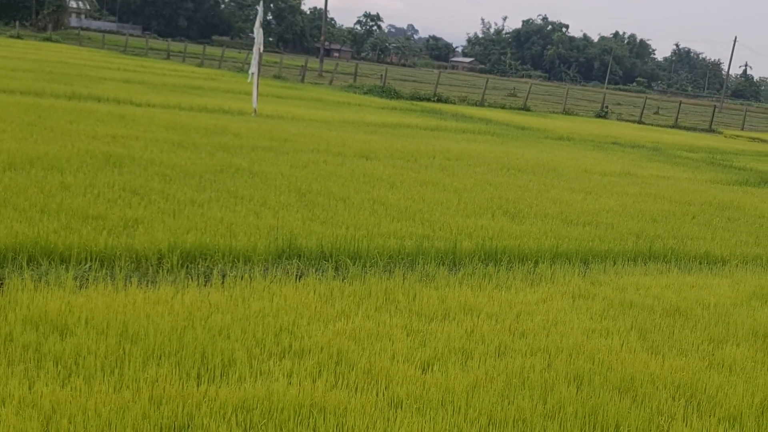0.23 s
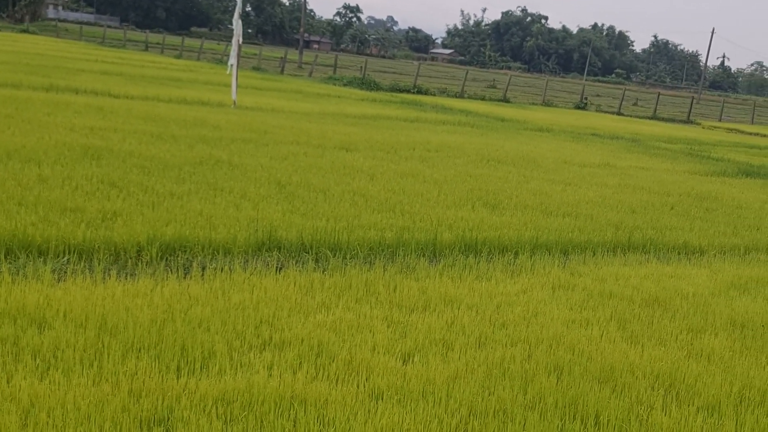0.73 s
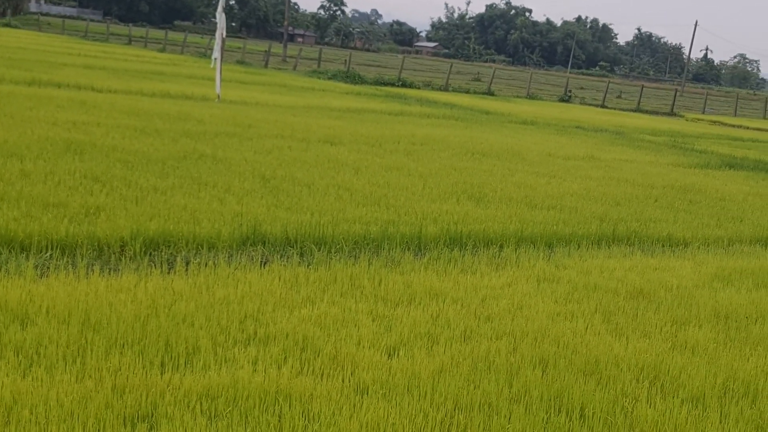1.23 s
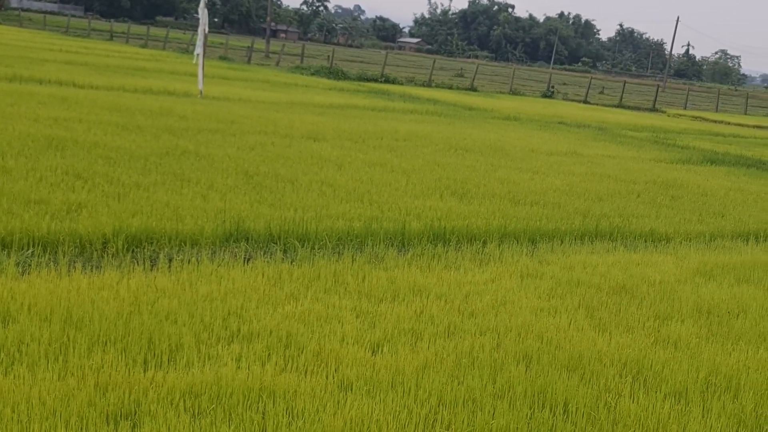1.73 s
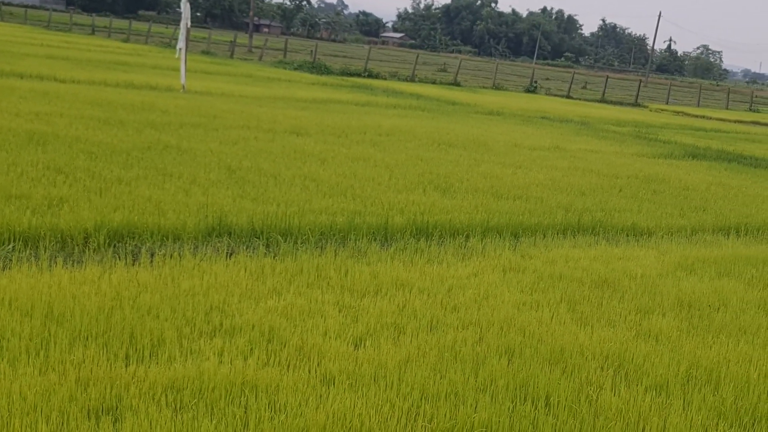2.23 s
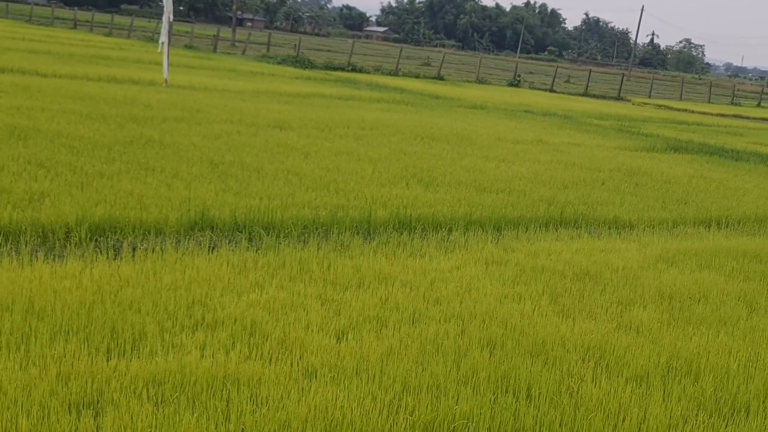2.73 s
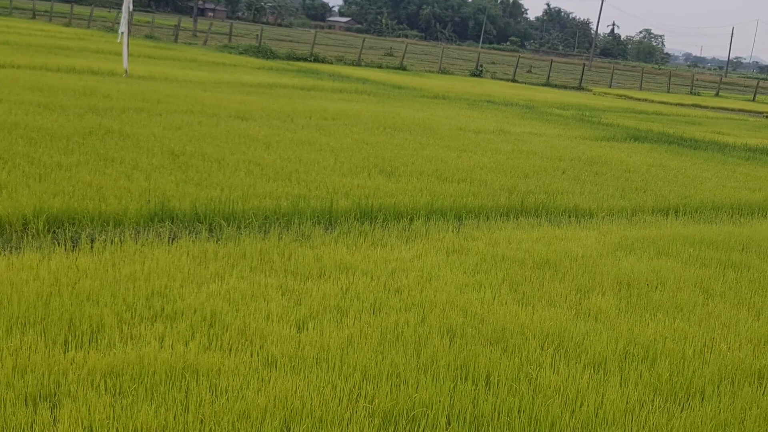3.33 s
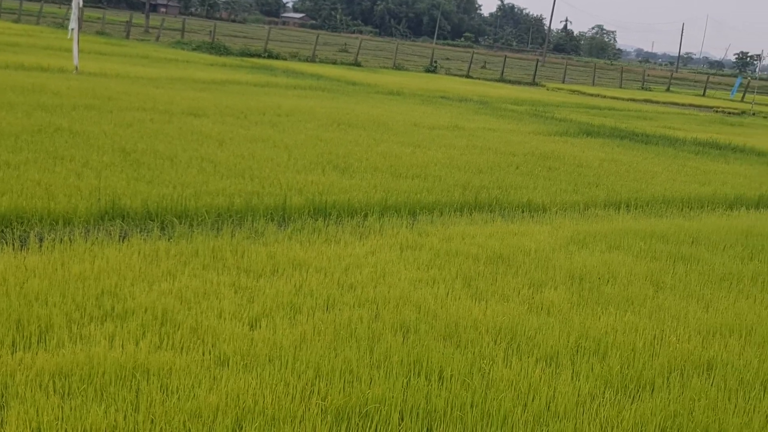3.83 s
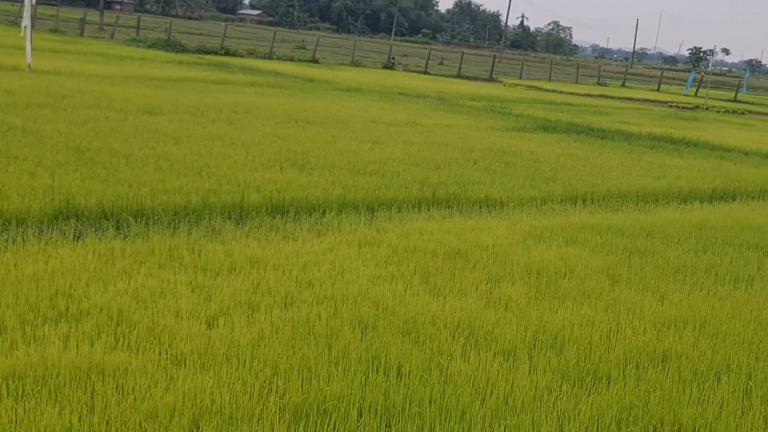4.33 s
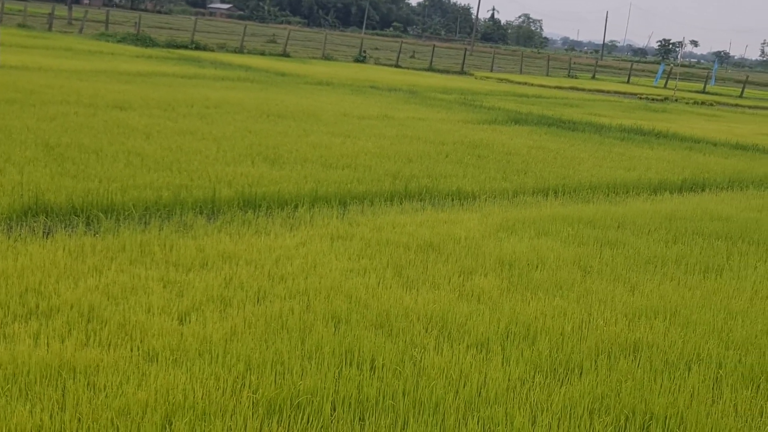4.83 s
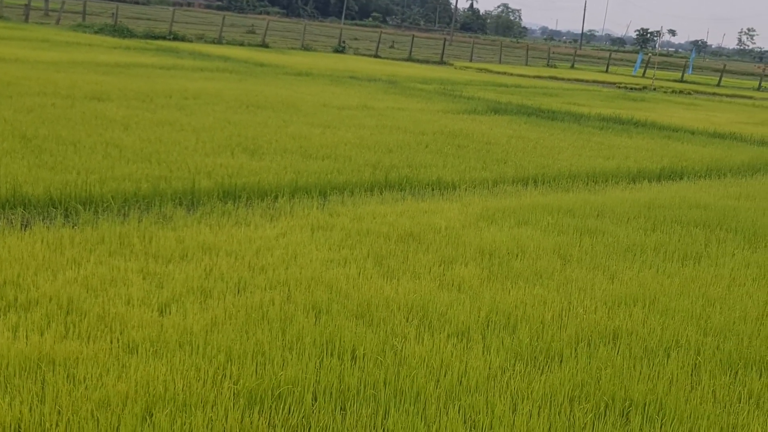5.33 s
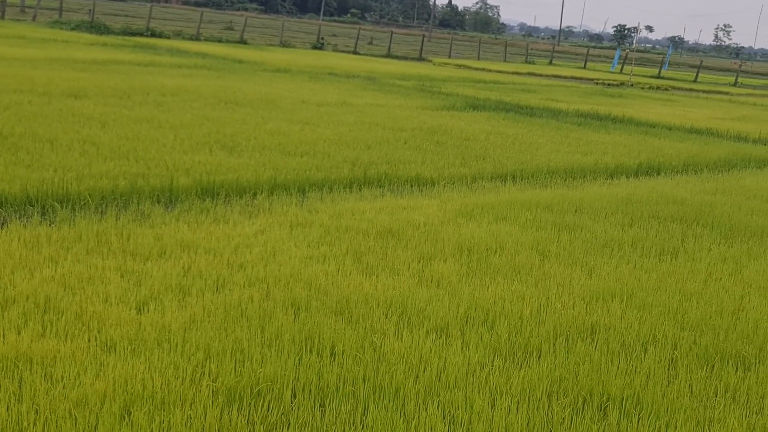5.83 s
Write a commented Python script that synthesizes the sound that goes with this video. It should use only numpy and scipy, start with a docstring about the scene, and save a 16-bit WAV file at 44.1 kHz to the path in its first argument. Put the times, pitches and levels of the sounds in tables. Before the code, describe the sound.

Crickets trill in a steady high shimmer over a low engine hum while a raspy bird calls repeatedly and small dry clicks snap close by.

```python
"""A rice field in open air: pulsing crickets trill over the noise shimmer of farther insects.
Katydids, scraped and ticking strokes rung through wing resonances, buzz in bouts among the stalks.
A raspy bird of gliding, fluttering tones calls up and down, echoed as decaying noise by the tree line.
Fainter birds whistle and call; a distant engine hums on three firing orders.
Small dry clicks, bursts of noise with a brief ring, sound close to the microphone."""
import sys
import numpy as np
from scipy import signal
from scipy.fft import rfft, irfft, next_fast_len
from scipy.io import wavfile
from scipy.ndimage import map_coordinates

SR = 44100
rng = np.random.default_rng(int(sys.argv[2]) if len(sys.argv) > 2 else 0)


def int16_out(signal):
    """Quantize to a 16-bit WAV file."""
    q = np.round(np.clip(np.atleast_2d(signal).T, -1, 1) * 32767)
    wavfile.write(sys.argv[1], SR, q.astype(np.int16))


N = 268965

# the pitches that near and far crickets share: pitch_hz [Hz], relative_db [dB]
CHORUS = [(4100, -36), (4550, -13), (4900, -2.5), (5350, 3), (5720, 3), (6050, -6), (6600, -54)]


def amp(db):
    """Decibels to gain."""
    return 10 ** (np.asarray(db) / 20)


def unit(x):
    """Scale to rms 1."""
    return x / np.sqrt(np.mean(x ** 2) + 1e-20)


def along(points, hz):
    """Read (Hz, value) points on a log frequency axis."""
    point_hz, values = np.transpose(points)
    return np.interp(np.log(hz + 1), np.log(point_hz + 1), values)


def curves(rows):
    """One value per sample for each column after the time."""
    times, *columns = np.transpose(rows)
    return [np.interp(np.arange(N) / SR, times, column) for column in columns]


def wobble(rate):
    """A smooth random curve, rate knots a second."""
    knots = rng.standard_normal(int(N * rate / SR) + 4)
    fine = map_coordinates(knots, [np.linspace(0, N * rate / SR, N // 32)])
    return np.interp(np.linspace(0, len(fine) - 1, N), np.arange(len(fine)), fine)


def turns(hz):
    """Running phase in radians of a moving frequency."""
    return 2 * np.pi * np.cumsum(hz) / SR


def filtered(x, response):
    """Shape x by a response of frequency."""
    m = next_fast_len(N + SR // 4)
    return irfft(rfft(x, m) * response(np.fft.rfftfreq(m, 1 / SR)), m)[..., :N]


def pan(left_db):
    """Channel gains for a left-minus-right level in dB."""
    return amp([[left_db / 2], [-left_db / 2]])


def add(track, s, sound):
    """Mix a sound into a track at time s, or at 0 if s is negative."""
    i = max(round(s * SR), 0)
    part = track[..., i:i + sound.shape[-1]]
    part += sound[..., :part.shape[-1]]


def rush(spectrum):
    """Coloured stereo noise of rms 1, alike in the bass and mostly unrelated in the treble."""
    # left-right likeness: frequency_hz [Hz], correlation [-1 to 1]
    likeness = [(60, 0.95), (220, 0.99), (450, 0.6), (800, -0.0015), (1300, -0.37), (3000, -0.0061),
                (12000, -0.096)]

    def response(hz):
        turn = np.arccos(np.clip(along(likeness, hz), -1, 1)) / 2
        return amp(along(spectrum, hz)) * [np.cos(turn), np.sin(turn)]

    mid, side = filtered(rng.standard_normal((2, N)), response)
    return unit(np.array([mid + side, mid - side]))


def open_air():
    """Coloured noise of the open field, its level drifting slightly."""
    # colour: frequency_hz [Hz], density_db [relative dB per Hz]
    air_colour = [(20, -0.5), (45, 8), (75, 13), (125, 3.5), (200, -6.5), (280, -11), (390, -11),
                  (550, -17), (1300, -16), (2400, -18), (3600, -26.5), (6000, -20.5), (11000, -37),
                  (15500, -56)]
    return amp(-55.0 + wobble(8.7)) * rush(air_colour)


def far_insects():
    """Farther insects merge into a shimmer: noise in the chorus band and a higher fizz."""
    # colour: frequency_hz [Hz], density_db [relative dB per Hz]
    fizz_colour = [(4000, -22), (6300, -6), (7000, -12.5), (7500, -2.5), (8100, -3), (9200, 3), (9650, -6),
                   (10000, 2.5), (11200, 3.5), (12000, -13.5), (15000, -15)]
    return amp(-61.5) * rush(CHORUS) + amp(-68.5) * rush(fizz_colour)


def crickets(low_hz, high_hz, pulse_rate, sag_hz, flutter_db, count):
    """Crickets, each pulsing a tone of its own that bends during every wing stroke."""
    out = np.zeros((2, N))
    for pitch in np.linspace(low_hz, high_hz, count):
        stroke = turns(pulse_rate * rng.uniform(.5, 1.5) * (1 + .1 * wobble(20)))
        phase = turns(pitch + sag_hz * np.sin(stroke) + 110 * wobble(200))
        size = (1 + np.cos(stroke)) * amp(along(CHORUS, pitch) + flutter_db * wobble(8))
        # a phase of its own in each channel spreads the singer out
        out += size * np.sin(phase + rng.uniform(0, 2 * np.pi, (2, 1)))
    return unit(out)


def engine():
    """Only the lowest firing orders carry across the field, wavering in the air."""
    # the drone at its second firing order: time_s [s], pitch_hz [Hz]
    drone = [(0.06, 97.63), (1.54, 97.33), (1.64, 101.4), (1.78, 101.8), (2.04, 105.9), (2.51, 105.9),
             (2.97, 107.0), (4.37, 104), (4.51, 106), (6.04, 105.9)]
    # the hum's changing levels, before the waver: time_s [s], first_order_db [dB], second_order_db [dB]
    hum = [(0.08, -50.5, -48.5), (1.44, -52.5, -47), (1.6, -47, -60.5), (1.95, -50.5, -49.5),
           (4.17, -59, -49), (4.23, -46, -56.5), (4.51, -64, -48.5), (4.99, -53.5, -51.5),
           (6.02, -56.5, -51.5)]
    phase = turns(curves(drone)[0] / 2)
    first_db, second_db = curves(hum)
    waver_db = wobble(4.04)
    orders_db = [first_db + .5 * wobble(7), second_db + .4 * waver_db, -67.5 + 1.5 * waver_db]
    lead = np.array([[0], [.5]])  # radians: the hum reaches the right channel first
    orders = sum(amp(db) * np.sin(k * phase + lead) for k, db in enumerate(orders_db, 1))
    return pan(-1.4) * np.sqrt(2) * orders


def through_wing(x, wing):
    """Ring x through the bell-shaped resonances of a wing, at rms 1."""
    def response(f):
        return sum(amp(db) * np.exp(-.5 * ((f - hz) / width) ** 2) for hz, width, db in wing)

    return unit(filtered(x, response))


def katydid(bouts, wing, stroke_rate, backstroke, rough, swell, scatter=0.51):
    """Each bout (s, length s, dB) swells and stops short; opening and closing strokes scrape the wing in turn."""
    level = np.zeros(N)
    for start, length, db in bouts:
        t = np.arange(max(round(length * SR), 2)) / SR
        stop = np.clip((t[-1] - t) / 0.012, 0, 1)
        add(level, start, amp(db) * (1 - np.exp(-t / swell)) * stop)
    stroke = turns(stroke_rate * (1 + 0.012 * wobble(30)))
    force = np.where(np.cos(stroke) > 0, 1, backstroke)
    # one tick each half turn of the stroke
    ticks = force * np.diff(stroke // np.pi, prepend=0)
    # scattering among the stalks partly fills the gaps between strokes
    scrape = (force * np.cos(stroke) ** 2 + scatter) * rng.standard_normal((2, N))
    return level * unit(through_wing(ticks, wing) + rough * through_wing(scrape, wing))


def run_of_bouts(first, last, db):
    """Bouts stop on an even beat, each a little longer than the one before."""
    beat_s, first_bout_s = .27, .13
    lengthens = .22  # power of the bout's number in the run
    stops = np.linspace(first, last, round((last - first) / beat_s) + 1)
    lengths = first_bout_s * np.arange(1, len(stops) + 1) ** lengthens
    return [(stop - length, length, db) for stop, length in zip(stops, lengths)]


def katydids():
    """Four singers at different places in the rice, each with its own wing and stroke rate."""
    # runs of the high singer on the right: first_stop_s [s], last_stop_s [s], level_db [dB]
    high_runs = [(0.323, 1.437, -70), (2.418, 3.448, -69.5), (4.948, 5.499, -69.5)]
    # bouts of the thin singer on the left, then of the coarse one: start_s [s], level_db [dB]
    thin_bouts = [(.58, -78.5), (1.12, -73), (2.62, -76), (2.84, -73), (3.14, -73), (4.83, -72), (5.1, -73),
                  (5.29, -75)]
    coarse_bouts = [(.34, -71.5), (2.09, -64.5), (2.385, -64.5), (3.91, -65.5), (4.25, -67), (5.065, -68),
                    (5.305, -71)]
    # wing resonances: centre_hz [Hz], width_hz [Hz], relative_db [dB]
    high_wing = [(11230, 220, 0)]
    tireless_wing = [(10780, 290, 0)]
    thin_wing = [(8250, 250, 0)]
    coarse_wing = [(7070, 180, 1.5), (7820, 540, 1.5), (15000, 800, -12.5)]
    # mean wing stroke cycles by singer: stroke_rate [per second]
    rates = {"high": 104, "tireless": 110, "thin": 103.5, "coarse": 108}

    high = [bout for run in high_runs for bout in run_of_bouts(*run)]
    # the tireless singer repeats its bout on a loose beat
    first_s, beat_s, scatter_s = -.04, .2525, .008
    beats = np.arange(first_s, N / SR, beat_s)
    tireless = [(s, 0.226, -71.5) for s in rng.normal(beats, scatter_s)]
    thin = [(s, 0.16, db) for s, db in thin_bouts]
    coarse = [(s, 0.15, db) for s, db in coarse_bouts]

    high_song = katydid(high, high_wing, rates["high"], backstroke=0.2, rough=1.3, swell=0.035, scatter=.1)
    tireless_song = katydid(tireless, tireless_wing, rates["tireless"], backstroke=0.23, rough=6.4, swell=0.02)
    thin_song = katydid(thin, thin_wing, rates["thin"], backstroke=1.0, rough=1.6, swell=0.033)
    coarse_song = katydid(coarse, coarse_wing, rates["coarse"], backstroke=0.99, rough=2.2, swell=0.015)
    return pan(-14.5) * high_song + pan(-2.8) * tireless_song + pan(16.4) * thin_song + pan(1.5) * coarse_song


def clicks():
    """Each click is a short crackling burst: a dull knock, a bright snap and a brief ring, with a faint tail."""
    # clicks close to the microphone, levels before the crackle:
    # start_s [s], length_s [s], knock_db [dB], snap_db [dB], ring_hz [mean Hz], ring_db [dB]
    click_rows = [(0.073, 0.026, -64, -54, 3020, -70), (0.2116, 0.0072, -54, -44, 2830, -48),
                  (.218, 0.0092, -47, -51, 1920, -50), (.881, 0.015, -48, -51, 2030, -54),
                  (3.803, 0.023, -58.5, -53.5, 3830, -56), (3.961, 0.04, -53, -60, 1909, -79),
                  (4.385, 0.012, -56.5, -46, 3970, -51), (4.5842, 0.0043, -45, -38.5, 4170, -50.5),
                  (5.069, 0.02, -49, -54.5, 2730, -56), (5.7, 0.025, -50, -62, 2780, -54.5)]
    # colours: frequency_hz [Hz], density_db [relative dB per Hz]
    knock_colour = [(100, -14), (300, 0), (600, -3), (1150, -2), (1600, -8), (2600, -6), (3600, -18),
                    (8000, -35)]
    snap_colour = [(800, -54), (2000, 6.5), (3000, -4.5), (4200, 0), (5400, 6), (7000, 4.5), (8200, -7),
                   (11000, -5), (15500, -11)]
    knock, snap, ring = np.zeros((3, N))
    t = np.arange(SR // 8) / SR
    unsteady = 1 + 0.087 * wobble(700)[:len(t)]
    for s, length, knock_db, snap_db, ring_hz, ring_db in click_rows:
        burst_and_tail = np.exp(-(t / length) ** 2) + .12 * np.exp(-t / .03)
        shape = (1 - np.exp(-t / .001)) * burst_and_tail
        add(knock, s, amp(knock_db) * shape)
        add(snap, s, amp(snap_db) * shape)
        add(ring, s, amp(ring_db) * shape * np.sin(turns(ring_hz * unsteady)))
    crackle = amp(2.2 * wobble(600))
    bright = snap * rush(snap_colour) + ring
    return crackle * (knock * rush(knock_colour) + pan(-3.8) * bright)


def tree_line(x, delay):
    """A diffuse stereo echo: noise that builds up over the field and fades, sooner in the treble."""
    # frequency_hz [Hz], t60_s [s to fall 60 dB]
    fading = [(500, 0.75), (2000, 0.55), (8000, 0.085)]
    hz, t, z = signal.stft(rng.standard_normal((2, SR // 2)), SR, nperseg=256)
    fade = amp(-60 * t / along(fading, hz)[:, None])
    build_up = 1 - np.exp(-t / delay)
    tail = signal.istft(z * fade * build_up, SR, nperseg=256)[1]
    return signal.fftconvolve(x[None], tail / np.linalg.norm(tail[0]), axes=1)[:, :N]


def bird(notes, rasp, rasp_hz, waver):
    """Gliding notes that swell towards their end; an uneven flutter of the syrinx adds raspy side tones."""
    out = np.zeros(N)
    flutter = turns(rasp_hz * (1 + 0.123 * wobble(200)))
    drift = 1 + waver * wobble(350)
    shake = amp(7 * rasp * wobble(600))
    for s, length, start_hz, end_hz, db in notes:
        u = np.linspace(0, 1, max(round(length * SR), 8))
        now = max(round(s * SR), 0) + np.arange(len(u))
        phase = turns(start_hz * (end_hz / start_hz) ** u * drift[now])
        side_tones = np.sin(phase - flutter[now]) + .5 * np.sin(phase + flutter[now])
        tone = np.sin(phase) + rasp * side_tones
        swell = np.abs(np.sin(np.pi * u ** 1.44)) ** 0.3
        add(out, s, amp(db) * np.sqrt(2) * swell * tone * shake[now])
    return out


def sung(figure, s, db, stretch=1):
    """The notes of a figure, sung from time s."""
    return [(s + stretch * after, stretch * length, start_hz, end_hz, db + note_db)
            for after, length, start_hz, end_hz, note_db in figure]


def raspy_caller():
    """The main bird glides up to a peak, pauses and falls, hoarser on its falls; another bird adds a hoarse
    arching chirp."""
    # figures, one row a note, before any time stretch:
    # after_s [s into the figure], length_s [s], start_hz [Hz], end_hz [Hz], relative_db [dB]
    glide = [(0.0013, 0.065, 1970, 2275, -1)]
    peak = [(.053, 0.0323, 2354, 2700, 0)]
    fall = [(0, .021, 2288, 1947, -1), (.018, .072, 1914, 1873, -5)]
    tag = [(0, 0.013, 2655, 2230, -3), (.062, 0.048, 2013, 1844, -8)]
    arch = [(0, 0.028, 2400, 2940, 0), (0.026, 0.074, 3170, 2530, .5), (0.013, .05, 2400, 2110, -7)]
    # calls: start_s [s], glide_db [dB], peak_db [dB], stretch [time factor of glide and peak],
    # fall_after_s [s from the start], fall_db [dB]
    calls = [(.011, -52.5, -54.5, 1.02, 0.18, -57), (1.577, -55.5, -48.5, 1, 0.27, -56.5),
             (3.277, -53, -44, 1.1, .201, -53), (4.772, -57, -47, 1, .176, -60.5)]
    # a tick and a soft note that close most calls, lone ticks, and another bird's arching chirp: start_s [s],
    # level_db [dB]
    tags = [(.291, -58.5), (1.929, -54), (5.043, -57)]
    lone_ticks = [(.486, -62), (2.311, -62.5)]
    arches = [(4.505, -58.5)]

    clear_notes, hoarse_notes = [], []
    for s, glide_db, peak_db, stretch, fall_after, fall_db in calls:
        clear_notes += sung(glide, s, glide_db, stretch) + sung(peak, s, peak_db, stretch)
        hoarse_notes += sung(fall, s + fall_after, fall_db)
    for s, db in tags:
        clear_notes += sung(tag, s, db)
    for s, db in lone_ticks:
        clear_notes += sung(tag[:1], s, db)
    for s, db in arches:
        hoarse_notes += sung(arch, s, db)
    clear = bird(clear_notes, rasp=.3, rasp_hz=280, waver=.015)
    hoarse = bird(hoarse_notes, rasp=.5, rasp_hz=200, waver=.025)
    return clear + hoarse


def whistler():
    """A farther bird whistles pure falling glides."""
    # whistles: start_s [s], start_hz [Hz], level_db [dB]
    whistles = [(0.799, 3540, -67.5), (4.62, 3080, -72.5)]
    length_s, end_hz = .163, 2470
    notes = [(s, length_s, hz, end_hz, db) for s, hz, db in whistles]
    return bird(notes, rasp=0, rasp_hz=0, waver=0.016)


def far_birds():
    """Very distant birds, heard only as sound scattered by the tree line."""
    # calls before scattering: start_s [s], start_hz [Hz], level_db [dB]
    far_calls = [(1.97, 3210, -75), (2.34, 3210, -74), (2.35, 4310, -77), (2.699, 3230, -74.5),
                 (2.91, 3260, -77.5)]
    length_s, end_ratio = .062, .93  # end pitch over start pitch
    notes = [(s, length_s, hz, end_ratio * hz, db) for s, hz, db in far_calls]
    return tree_line(bird(notes, rasp=0.52, rasp_hz=280, waver=0.024), delay=0.0039)


def birds():
    """The raspy caller and the whistler, direct and echoed, with the scattered far birds."""
    near = raspy_caller() + whistler()
    echo = tree_line(near, delay=0.0031)
    centre = echo.mean(axis=0)
    echo_width, echo_db = 0.67, -6.5  # a width of 0 is mono
    echo = centre + echo_width * (echo - centre)
    return pan(1.3) * (near + amp(echo_db) * echo) + far_birds()


def scene():
    """Insects, engine, clicks and birds over the open air."""
    near_crickets = amp(-65) * crickets(low_hz=4755, high_hz=5874, pulse_rate=60, sag_hz=157,
                                        flutter_db=5.0, count=11)
    background = pan(-1.14) * (open_air() + far_insects() + near_crickets)
    return background + engine() + katydids() + clicks() + birds()


def record(dry):
    """The recorder keeps nothing above its band limit."""
    top_hz = 15780
    return filtered(dry, lambda hz: hz < top_hz)


dry = scene()
out = record(dry)
int16_out(out)
```